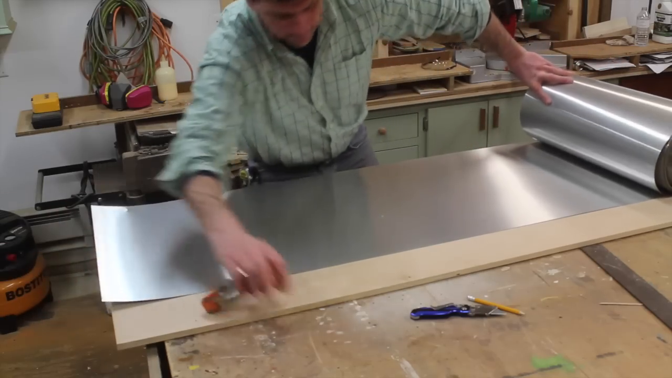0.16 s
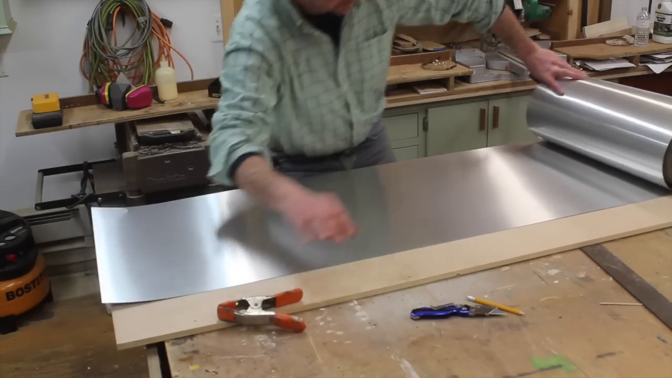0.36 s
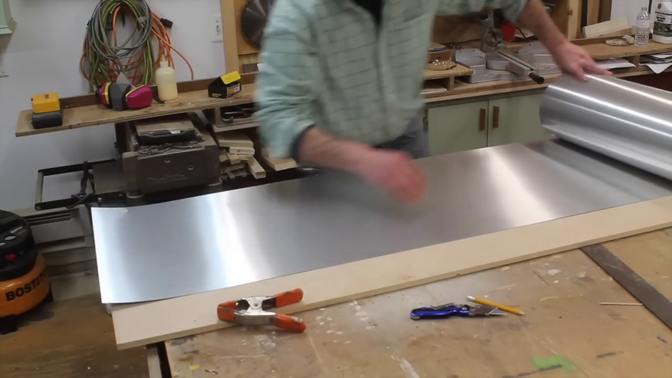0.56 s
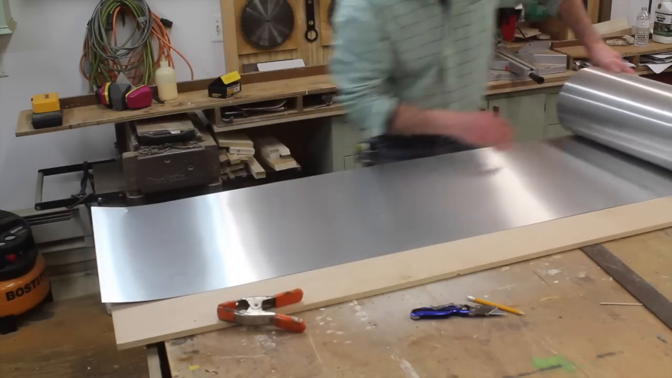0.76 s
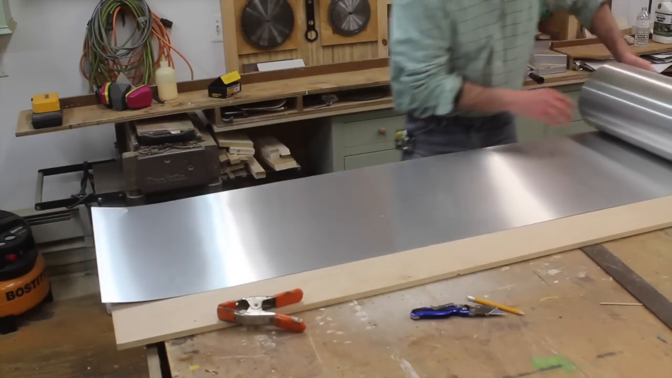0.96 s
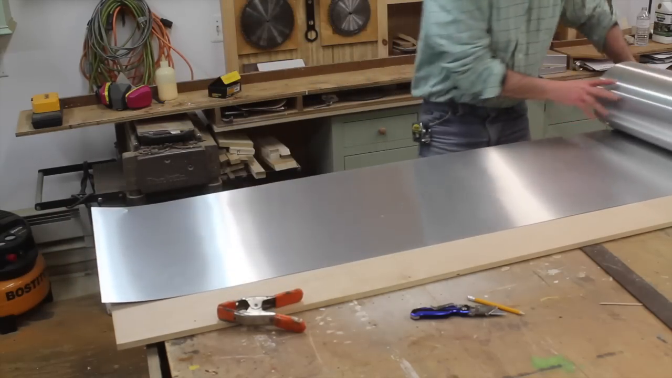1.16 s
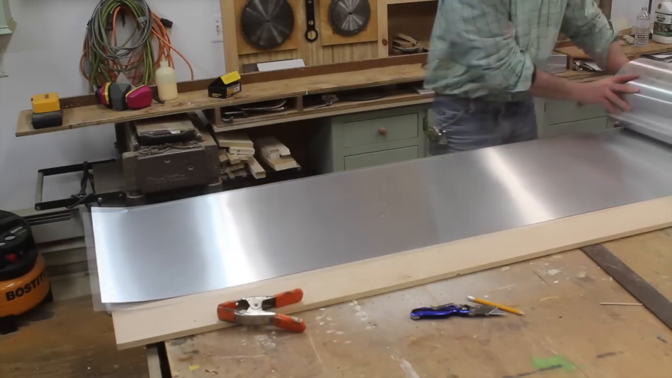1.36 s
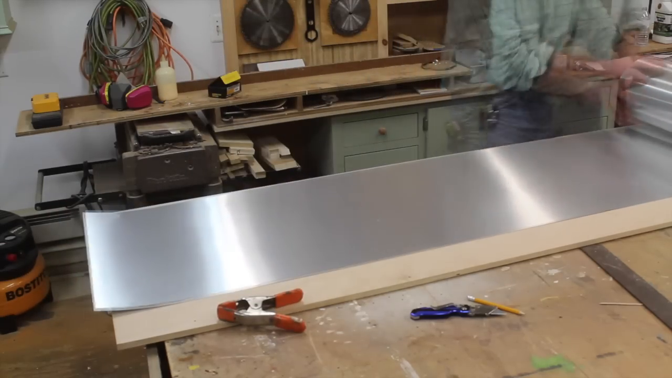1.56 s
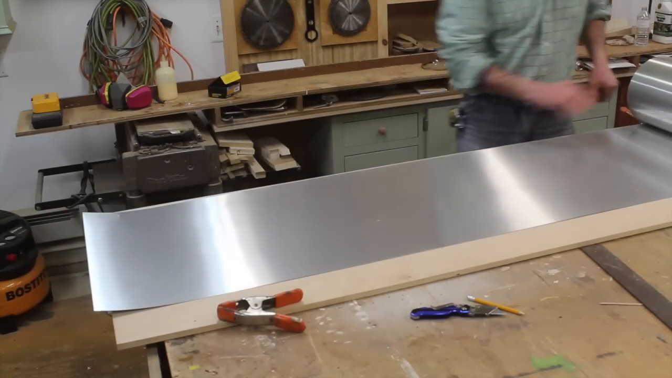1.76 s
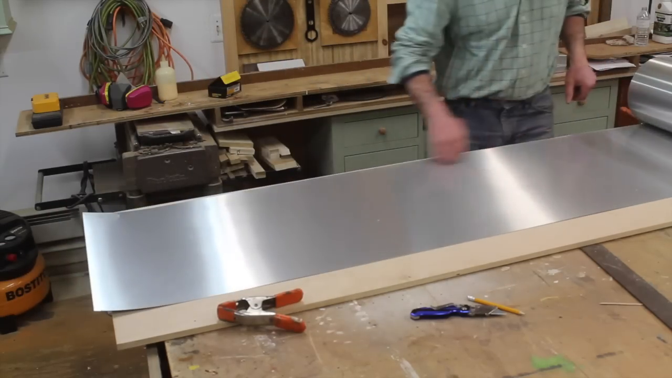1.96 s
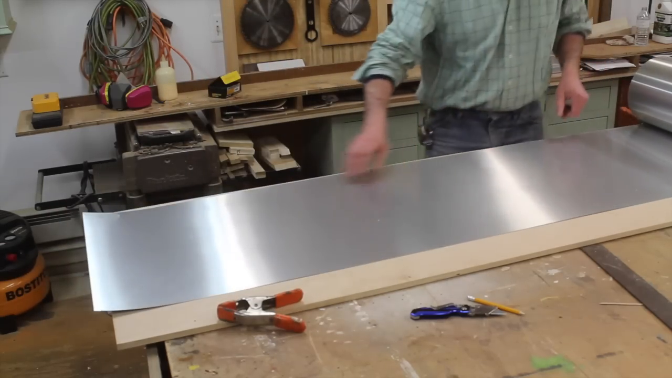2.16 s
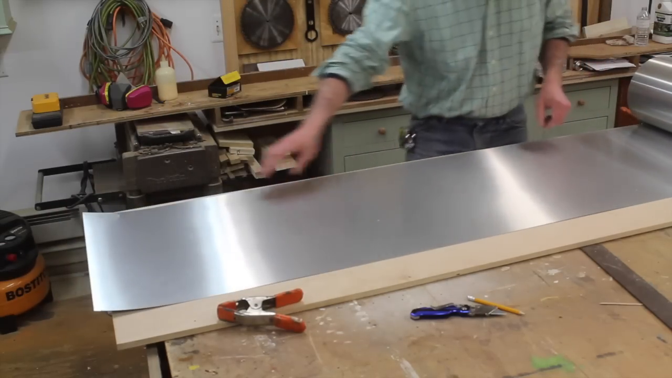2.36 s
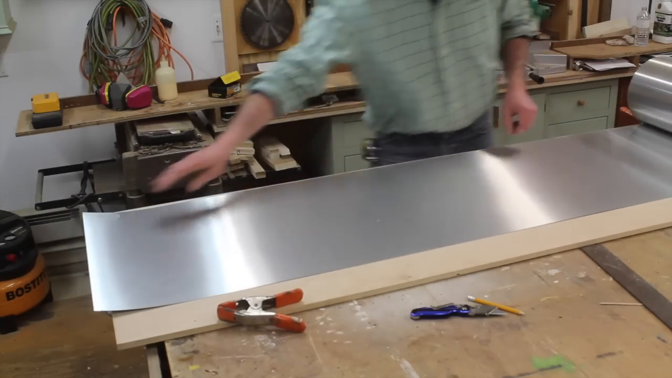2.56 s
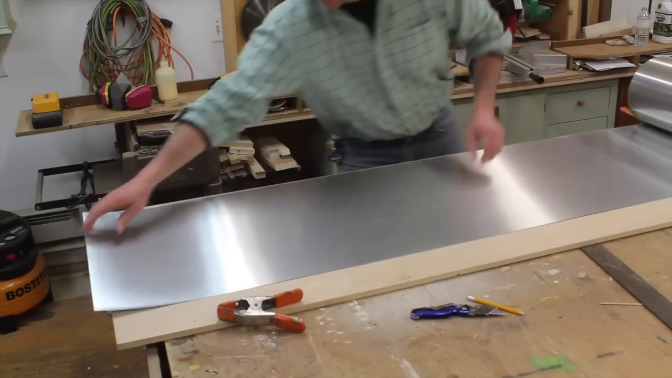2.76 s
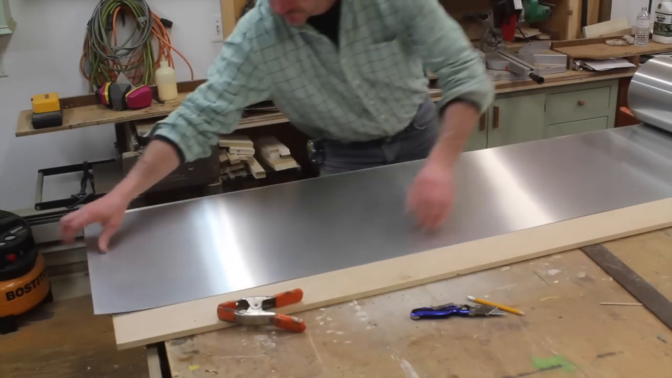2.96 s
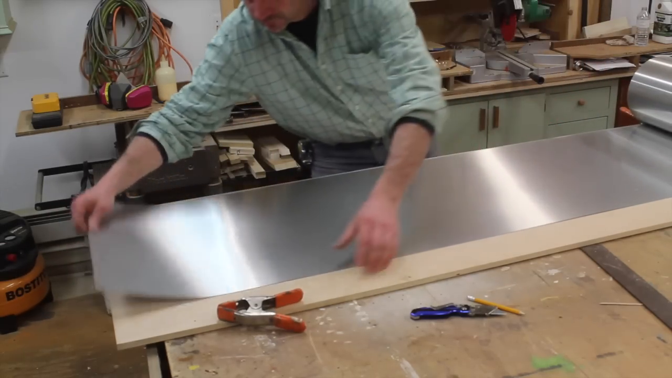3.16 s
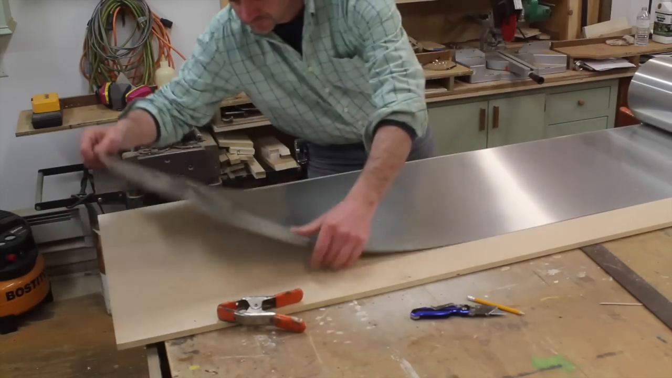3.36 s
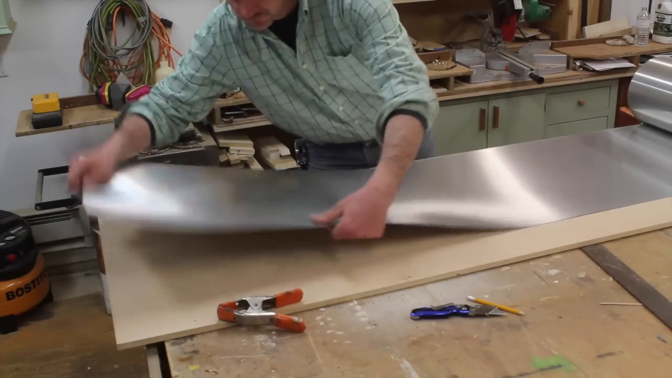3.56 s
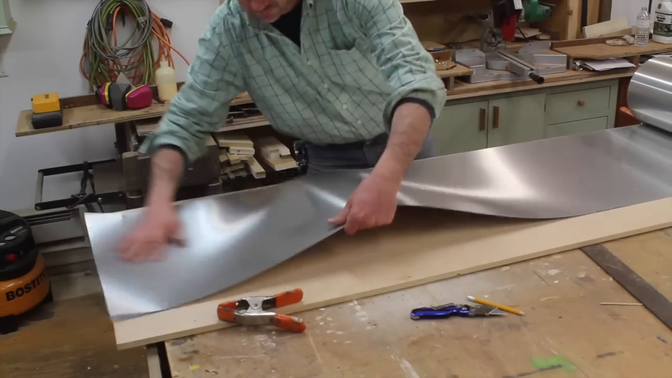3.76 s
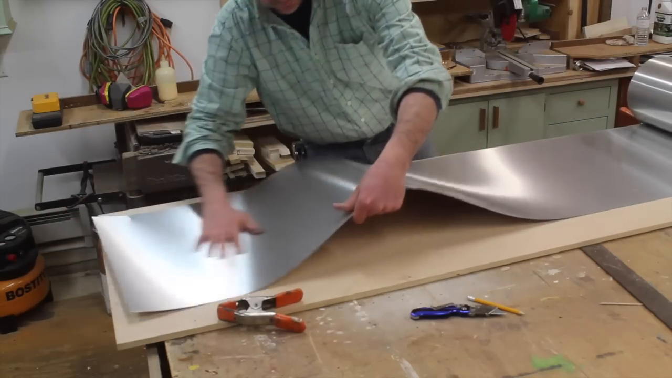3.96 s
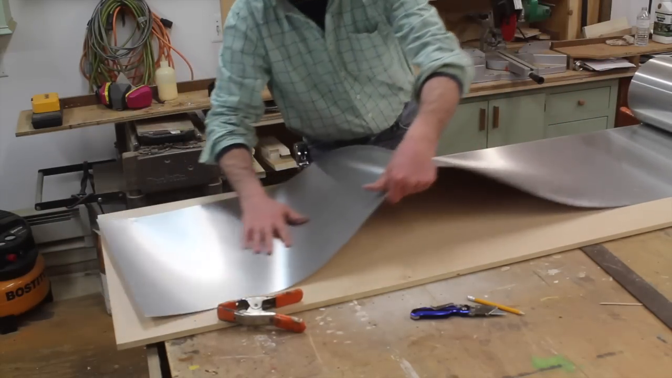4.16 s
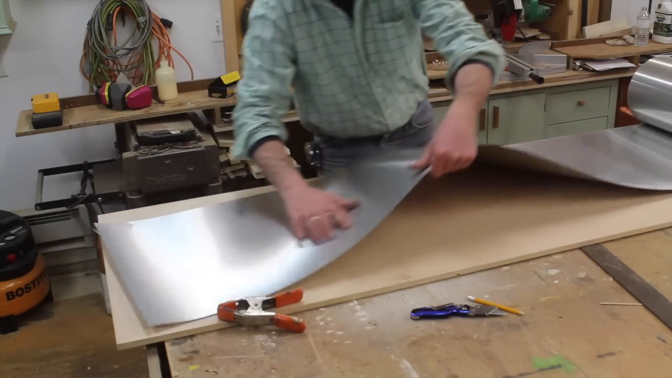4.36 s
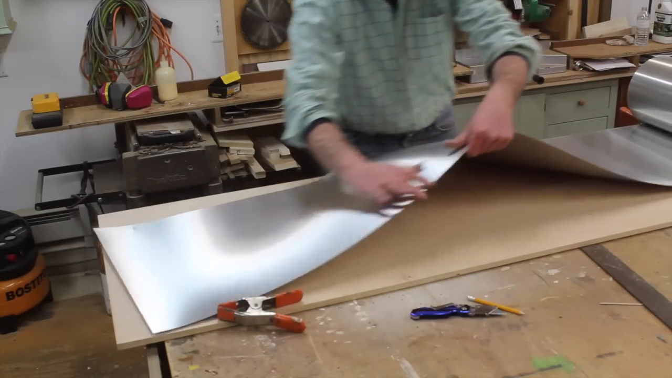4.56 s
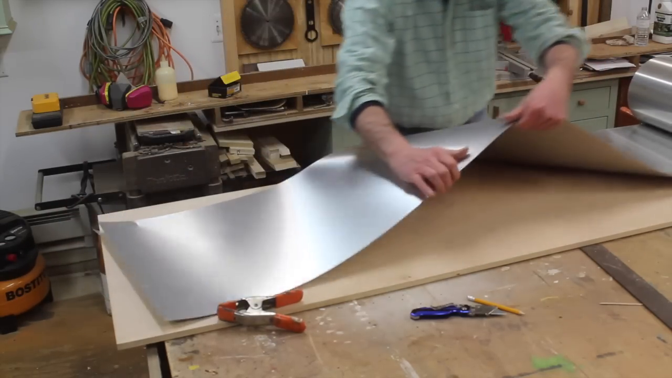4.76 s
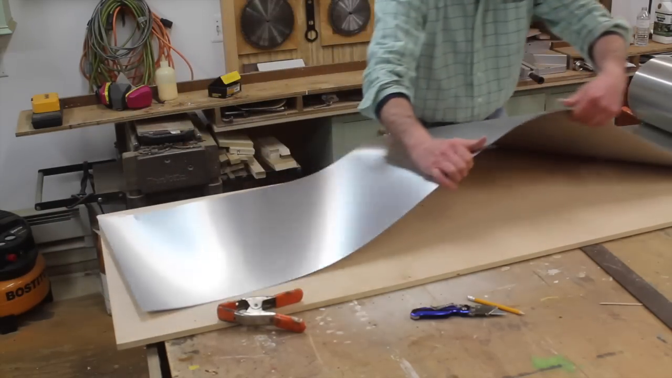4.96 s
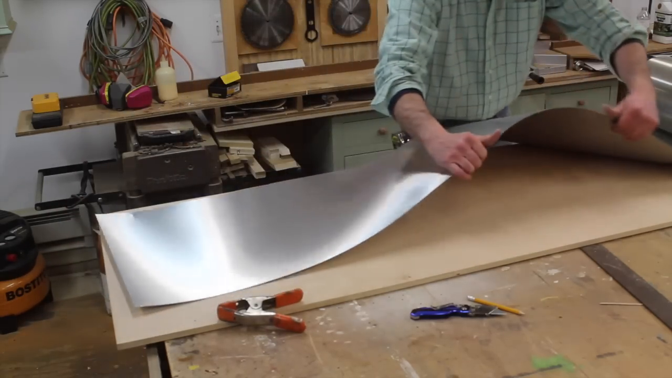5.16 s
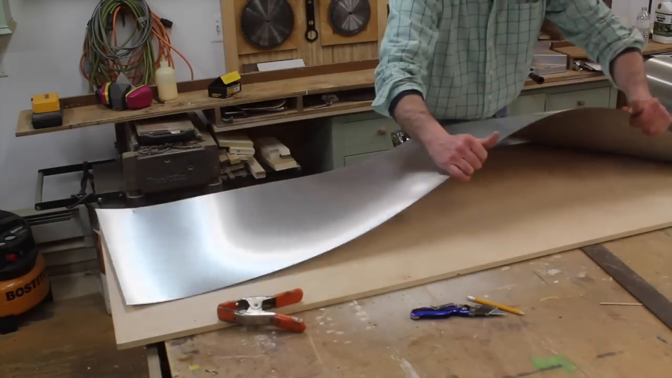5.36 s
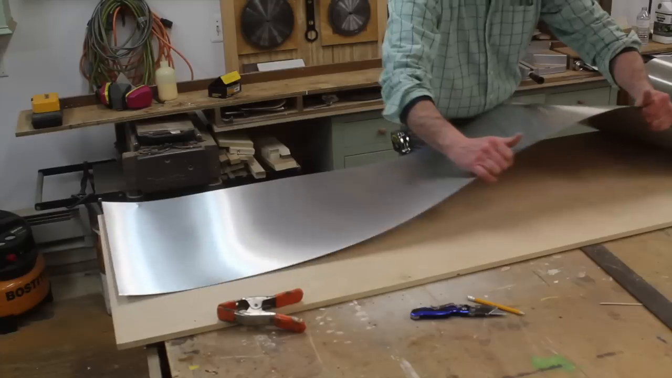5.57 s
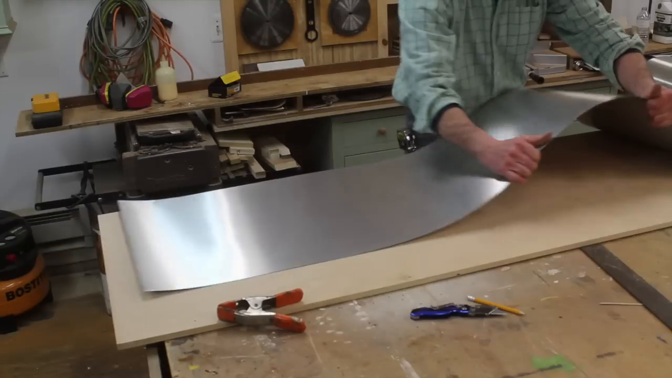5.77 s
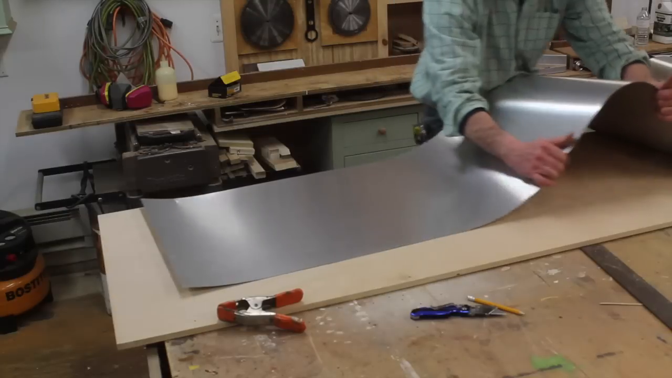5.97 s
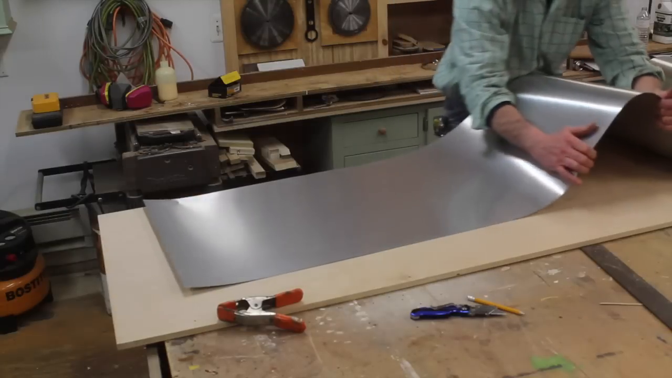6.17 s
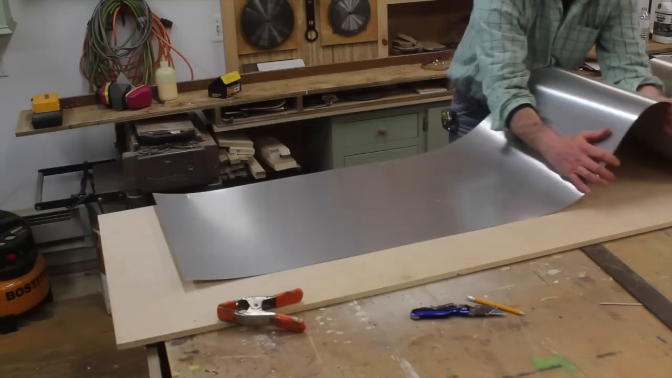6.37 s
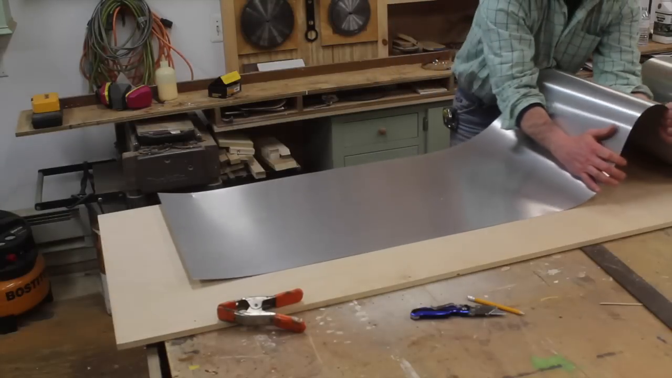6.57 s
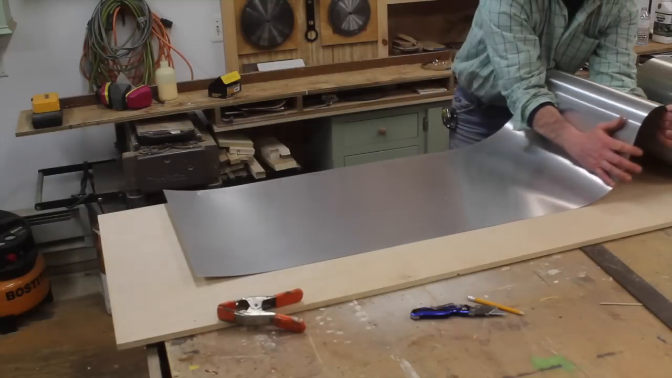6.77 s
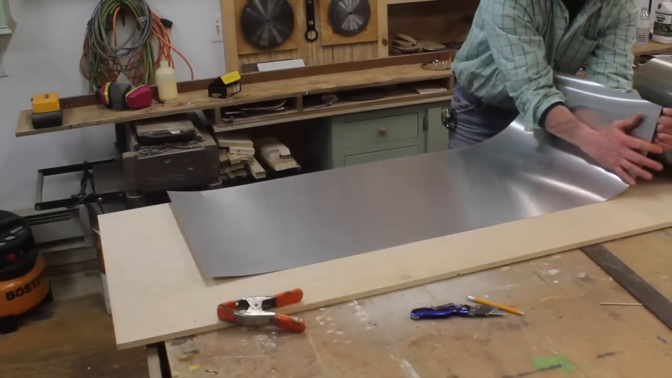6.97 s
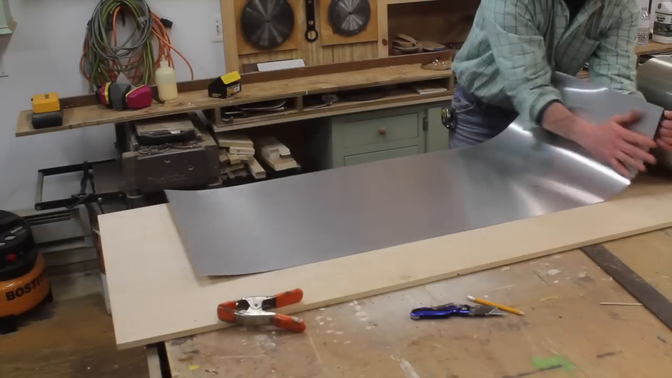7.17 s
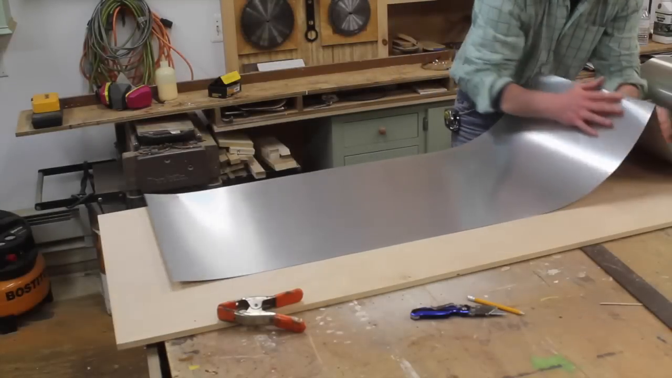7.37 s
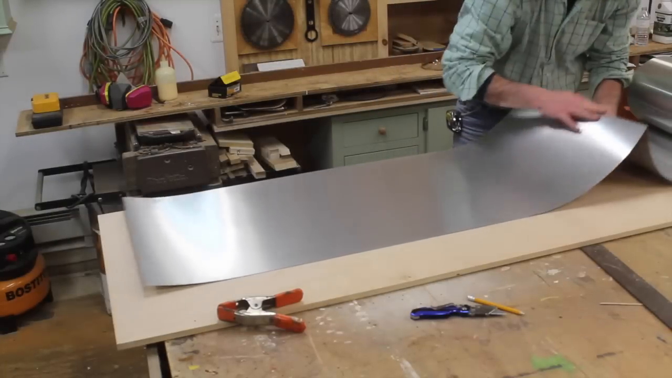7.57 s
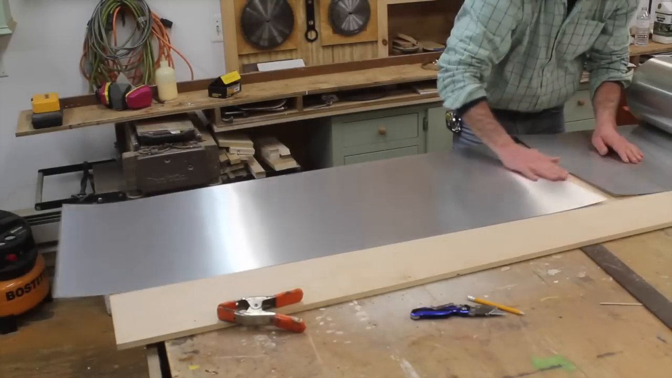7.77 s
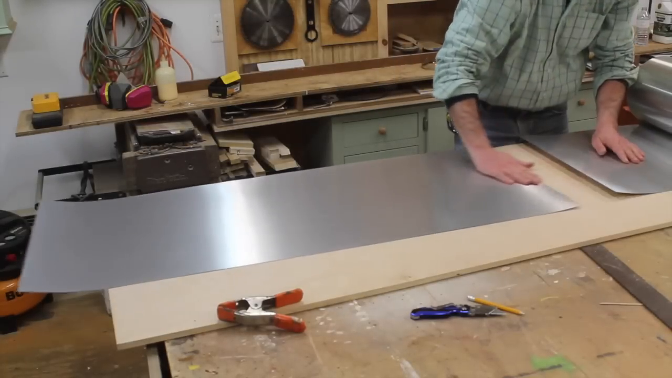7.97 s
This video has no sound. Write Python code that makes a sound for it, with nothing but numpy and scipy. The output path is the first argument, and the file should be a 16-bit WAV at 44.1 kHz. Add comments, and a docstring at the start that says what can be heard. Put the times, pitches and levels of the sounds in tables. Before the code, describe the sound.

A faint metallic ring fades at the start. At about 0.3 seconds a spring clamp drops on a wooden bench, bouncing quickly with a rattling spring and ringing jaws. A thin aluminium sheet pops once near 1 second. Quiet sliding, soft creases and dull thuds of feet and bench continue until about 3 seconds. At 3.4 the sheet buckles loudly, wobbles, and slaps down at 3.8 with a brief ring. From 4 to 7.7 seconds hands and the sheet's edge rub over metal and wood, with softer flexing pops, strongest between 5.5 and 6 seconds. At 7.8 the sheet snaps with a sharp crack, the loudest sound, and the freed piece rings over a thud and a short scrape. One camera microphone hears the workshop with faint steady hiss; the loudest hits sound squashed and briefly push the volume down.

```python
"""In a workshop, a faint ring dies away and a spring clamp drops on a wooden bench, bouncing and rattling.
From about 1 s a thin aluminium sheet is lifted and flexed: it buckles, pops and rings, while its edge
and the hands slide over wood and metal, and bench and floor thud. Near 3.8 s the sheet slaps down.
At 7.8 s it snaps along a scored line and the freed piece rings on. A camera's one microphone hears
it all; its amplifiers hiss, and loud sounds turn its volume down and have their peaks flattened."""
import sys
import numpy as np
from scipy import signal
from scipy.fft import rfft, irfft, next_fast_len
from scipy.io import wavfile
from scipy.ndimage import map_coordinates

SR = 44100
rng = np.random.default_rng(int(sys.argv[2]) if len(sys.argv) > 2 else 0)


def wav_record(signal):
    """Record a signal, one row per channel, as 16-bit PCM in the file named by sys.argv[1]."""
    frames = np.transpose(np.atleast_2d(signal))
    bounded = np.clip(frames, -1, 1)
    # unit amplitude maps onto the largest positive 16-bit level
    quanta = np.round(bounded * 32767).astype(np.int16)
    wavfile.write(sys.argv[1], SR, quanta)


N = 352932

# A mode is a pitch an object likes to ring at. Decay (t60) is the time to fade by 60 dB.
# Levels are relative. Sharp buckles and slaps of the sheet: (time [s], level [dB],
# lows over mids [dB], highs over mids [dB], ring over burst [dB], pitch the hit favours [Hz])
SHEET_POPS = [(1.026, -43, -0.5, -0.5, -1, 1370), (1.059, -14, -5.5, -5.5, -18, 920),
              (1.228, -33.5, -6, 1, -16, 1500), (1.81, -35, 4.5, -1, -12, 483),
              (3.4, 10, -22.5, -11.5, -14.5, 875), (3.772, 9, -23, -17.5, -7.5, 1350),
              (3.792, -1.5, -34, -6, -16, 1210), (4.097, -28, -34, -11, -16, 1300),
              (5.52, -18, -8, -13, -11, 2040), (6.037, -25.5, -0.5, -13, -6, 655),
              (6.365, -25.5, -25, 1, -11.5, 1810), (7.001, -35, 3.5, -5, -14, 596),
              (7.052, -19.5, -23, -1.5, -15.5, 1640), (7.523, -37, 5, -1.5, -13, 762),
              (7.79, 27, -8, -1, -24.5, 1080)]
# Creases rolling through the sheet: (the six columns of SHEET_POPS, rise time [ms])
SHEET_CREASES = [(1.148, -42.5, 11.5, 7.5, -18.5, 278, 6.3), (1.395, -43.5, 8.5, 0, -13, 277, 22),
                 (2.104, -30.5, 4, -6, -14, 254, 11.4), (2.467, -41.5, 9, -23, -4.5, 336, 7),
                 (2.634, -54, 16.5, -18, -2.5, 299, 3.6), (3.195, -45.5, 2.5, 8, -13, 348, 8.8),
                 (3.655, -23.5, 6.5, -30, -9.5, 390, 12), (3.672, -14.5, -1, -41, -5, 653, 13),
                 (3.709, -5, -3, -52, -12.5, 415, 12), (3.722, -7, -19, -30, -7, 859, 3.4),
                 (3.741, -15.5, 0.5, -48, 7, 677, 6), (3.757, -5.5, -2, -11, -7, 900, 22),
                 (4.284, -39.5, -9, -5, -9, 707, 8.9), (4.39, -35, -24, -6, -8, 667, 31),
                 (4.584, -29.5, -4, -18, -6.5, 595, 9.9), (4.68, -37, -3, 5, -16, 550, 12),
                 (5.134, -38, -0.5, -7, 0.5, 563, 5.4), (5.759, -28.5, -2, -39, -1, 698, 23),
                 (5.782, -31.5, -11, -38, -2.5, 800, 3), (5.826, -17, -5, -19, -0.5, 990, 9),
                 (5.961, -30, -15, -4, -7, 1360, 24), (6.788, -48, -0.5, 7.5, -8.5, 1466, 8),
                 (7.171, -51.5, 22, -14, -13.5, 285, 5), (7.264, -43.5, 7.5, 2, -23, 335, 23),
                 (7.385, -35.5, -26, 3, -9, 1180, 4.8), (7.56, -34, -4, 4.5, -15, 1090, 16),
                 (7.71, -38, -28, 9.5, -7, 1308, 10)]
# The clamp's bounces: (the six columns of SHEET_POPS)
CLAMP_BOUNCES = [(0.2635, -13, 10.5, 0.5, -19.5, 493), (0.274, -19.5, 17, 1.5, -13, 287),
                 (0.328, -6.5, 9.2, -0.5, -21, 1220), (0.337, -1, 11.8, 0, -17.5, 292),
                 (0.349, -42, 3, 9.5, -5, 312), (0.378, -18.5, 11, -6.5, -1.5, 293),
                 (0.41, -11, 1.4, -6, -4.5, 733), (0.419, -13, 14, -1.5, -18.5, 370),
                 (0.438, -29, 10, 3, 0, 473), (0.497, -27, 11.7, -24, -14, 288)]
# Rattles of the clamp's spring: (time [s], level [dB])
SPRING_TICKS = [(0.2633, -19.5), (0.276, -31), (0.3287, -23), (0.3372, -28.5), (0.351, -33), (0.3615, -29),
                (0.3768, -23), (0.4102, -18.5), (0.421, -29.5), (0.4374, -30), (0.4519, -29), (0.4709, -29),
                (0.485, -28)]
# Dull knocks of feet and bench: (time [s], level [dB], pitch [Hz], decay [s])
THUDS = [(0.273, -23.5, 110, 0.64), (0.49, -34, 52.6, 0.6), (0.665, -39, 153, 0.17),
         (1.058, -25.5, 160, 0.088), (1.284, -53, 162, 0.088), (1.465, -36.5, 154, 0.14),
         (1.811, -43.5, 110, 0.18), (2.034, -39.5, 127.5, 0.18), (2.117, -30.5, 133, .2),
         (2.638, -30.5, 160, 0.09), (2.916, -33, 65, 0.23), (2.931, -32, 151.6, 0.31),
         (3.072, -48.5, 65, 0.15), (3.198, -46.5, 65, 0.22), (3.851, -33, 62, 0.24),
         (4.469, -50.5, 131, 0.16), (4.707, -40, 88, 0.027), (6.062, -42, 144, 0.13),
         (6.41, -40, 171, 0.07), (6.477, -36.5, 154, 0.29), (7.003, -47.5, 81.5, 0.13),
         (7.168, -37.5, 134, 0.093), (7.8, -24, 164.5, 0.26), (7.831, -23, 69.4, 0.3)]
# Slides of sheet and hands: (time at full strength [s], swell [dB/s], hold [s], rubbing level [dB],
# wobble over rubbing [dB], rumble over rubbing [dB], grit over rubbing [dB])
STROKES = [(0.0, 200, 0.01, -51.5, -12, -16, -19.5), (0.46, 158, 0.058, -41.5, 11, 16.5, -13),
           (0.729, 394, 0.15, -58.5, 5.5, 5, -7), (1.01, 90, 0.21, -49.5, -2.5, -5.5, -14),
           (1.449, 59.5, 0.0067, -47, -1.5, 3, -11.5), (1.78, 277, 0.081, -52, -7, -1, -40),
           (2.04, 700, 0.048, -56, 2.5, 11, -12), (2.118, 300, 0.059, -37, -5.5, -4, -20.5),
           (2.55, 150, 0.03, -53.5, -0.5, -5, -13.5), (2.79, 596, 0.074, -59, -18, -19, -20),
           (2.95, 73, 0.045, -41.5, -3.5, -1.5, -17), (3.205, 700, 0.03, -52.5, -0.5, 0.5, -23),
           (3.47, 400, 0.1, -43, 14.5, -1, -19.5), (3.9, 40, 0.11, -46.5, 13, -4, -2),
           (4.06, 100, 0.13, -42.5, -6, -22, -13), (4.29, 100, 0.018, -46.5, -17, -16, -15),
           (4.44, 151, 0.14, -42, -2.5, -15, -13.5), (4.69, 100, 0.02, -43.5, 1, -3.5, -14),
           (4.99, 40, 0.11, -42.5, -1, -10.5, -11), (5.26, 40, 0.081, -43, -0.5, -11.5, -14),
           (5.58, 30, 0.12, -51.5, 4, -6, -9), (5.94, 129, 0.035, -43.5, 6.5, -4, -14),
           (6.12, 49.5, 0.12, -46.5, -0.5, -9, -10.5), (6.35, 40, 0.02, -47.5, -8, -12, -8.5),
           (6.42, 71.8, 0.088, -40, -3, -8.5, -13.5), (6.66, 100, 0.14, -54, 0.5, -10, -18),
           (7.108, 124, 0.0067, -44, -23, -9, -12.5), (7.29, 141, 0.1, -45.5, -0.5, -12, -10),
           (7.53, 60, 0.12, -51.5, 3, -5, -14.5), (7.75, 207, 0.044, -37.5, -2, -17, -2.5),
           (7.86, 296, 0.026, -26, -5, -20, -6.5)]

# Modes that stand out of a dense ring: (pitch [Hz], width [Hz], boost [dB])
SHEET_MODES = [(310, 17, 9.6), (432, 69, 2.1), (663, 5.9, 11), (752, 9, 6.8), (806, 36, 1.5),
               (1010, 43, 1.6), (1130, 35, 1.3), (1236, 33, 3.5), (1510, 15, 0.78), (2100, 16, 4.4),
               (2614, 38, 3.6), (2868, 12, 10.7), (3143, 150, 4.6), (3475, 8.7, 12), (4570, 37, 6),
               (6200, 280, 3.6), (7000, 360, 1.7)]
BENCH_AND_CLAMP_MODES = [(103, 8.6, 3), (177, 9.5, -8), (282, 20, 0), (277, 12, 10), (420, 17.8, -19),
                         (498, 28, 3.5), (565, 27, 9), (926, 150, 12), (1192, 83, 12.5), (2470, 100, 3.5),
                         (3160, 610, 3.5), (4880, 940, 8)]
# Modes heard as separate tones: (pitch [Hz], level [dB], decay [s])
SLAP_TONES = [(4580, -34.5, 0.22)]  # the sheet after it slaps down
OFFCUT_TONES = [(1170, -24.5, 0.59), (1620, -9, .5), (3130, -34.5, 0.46), (3420, -20, 1),
                (4320, -29.5, 0.24), (4590, -6, 0.36)]  # the freed piece
JAW_TONES = [(3080, -17.5, 0.49), (3300, -24.5, 0.21), (4380, -26.5, .5)]  # the clamp's steel jaws
SPRING_TONES = [(10800, 3.5, 0.007), (12400, -3, .004), (13300, 1, .004), (14200, 4, .004),
                (15100, 3, 0.0043), (8700, -3, 0.0051)]  # the clamp's spring
# How long object and room ring: (frequency [Hz], decay [s])
RING_DECAY = [(60, 0.6), (260, 0.38), (700, 0.45), (1840, 0.34), (3300, 0.5), (4850, 0.4), (8000, 0.33),
              (12800, 0.13)]
# Where the bands of a hit lie: (boom [Hz], lows [Hz], start of mids [Hz], end of mids [Hz], highs [Hz])
BAND_HZ = [130, 450, 900, 1650, 3000]
# How wide the bands are: (boom [Hz], lows [Hz], mids [Hz], highs [Hz], crack [Hz])
BAND_WIDTH_HZ = [220, 500, 1200, 2500, 10000]

# Tone colours of the noises: (frequency [Hz], level [dB])
BENCH_RUMBLE = [(18, -57.5), (30, -88.5), (59, -2.5), (97, -10), (140, 0.5), (197, -5), (259, 0.5),
                (405, -5.5), (450, -21), (500, -7.5), (650, -44.5), (1100, -120)]
SHEET_WOBBLE = [(120, -28), (200, -34.5), (354, 0), (401, -0.5), (510, 0), (1180, 1.5), (2400, -6),
                (3120, -55), (5280, -120)]
RUBBING = [(710, -40), (1200, -7), (1760, -2), (2280, -1.5), (3160, 0), (3980, -5.5), (6000, -18.5),
           (7800, -19), (13200, -120)]
FINE_GRIT = [(3000, -89), (4500, -1.5), (7000, -11), (9000, -9), (16000, -19)]
OPENING_RING = [(900, -31), (1400, 8), (1540, 8.5), (1750, -20.5), (2600, -26.5), (3200, -4.5), (4000, -54)]
ROOM_HISS = [(30, -5), (100, -0.5), (220, -21), (330, -29), (1000, -9.5), (2000, -19), (3250, -10),
             (3700, -15), (8000, -20.5), (13000, -19.5), (16000, -20.5)]  # room and microphone
AMPLIFIER_HISS = [(30, -6), (124, 2), (600, 0), (16000, -5)]

SLAP_ROW = 5  # the pop where the sheet slaps down
CRACK_DB, CRACK_SLOPE = -10.5, 3.28  # the crack gains 3.28 dB for each dB of highs
THUD_RISE = 0.04  # swell time as a share of the decay
STROKE_FADE_DB_PER_S = 118  # a slide dies away with the room
TREBLE_LIMIT_HZ = 15900


def sheet_buckles():
    """The flexed sheet gives way in sharp pops and in softer creases that swell in."""
    pops = hits(SHEET_POPS, SHEET_MODES, burst_t60=0.016, boom_db=-9.5, favoured_db=7,
                min_rise_ms=2.1, crack_db=5)
    creases = hits(SHEET_CREASES, SHEET_MODES, burst_t60=0.042, boom_db=-9.5, favoured_db=14.5,
                   min_rise_ms=1.1, crack_db=-17.5, boom_cut=0.9)
    return pops + creases


def slap_ring():
    """One mode rings on after the sheet slaps down."""
    return chime([SHEET_POPS[SLAP_ROW]], SLAP_TONES)


def offcut_ring():
    """The piece that breaks free at the last snap rings on."""
    snap_time = SHEET_POPS[-1][0]
    return chime([(snap_time, 0)], OFFCUT_TONES)


def clamp_drop():
    """The bouncing clamp knocks the bench; its spring rattles and its steel jaws ring."""
    knocks = hits(CLAMP_BOUNCES, BENCH_AND_CLAMP_MODES, burst_t60=0.032, boom_db=-14, favoured_db=14,
                  min_rise_ms=0.9, crack_db=-5)
    return knocks + spring_rattle() + chime(CLAMP_BOUNCES, JAW_TONES)


def spring_rattle():
    """Each tick rings the spring's short steel modes at new random strengths."""
    out, t = np.zeros(N), np.arange(SR // 40) / SR
    for start, db in SPRING_TICKS:
        ring = sum(amp(level + rng.normal(0, 2.3) - 60 * t / t60) * np.sin(2 * np.pi * hz * t)
                   for hz, level, t60 in SPRING_TONES)
        add(out, start, amp(db - 8) * ring * (1 - np.exp(-t / 0.00037)))
    return out


def hits(events, modes, burst_t60, boom_db, favoured_db, min_rise_ms, crack_db, boom_cut=0):
    """A hit is a short burst, then a dense ring. Its place, or the sheet's curve, favours one pitch."""
    out, ring_size, burst_size = np.zeros(N), SR // 2, SR // 8
    t = np.arange(ring_size) / SR
    spread = 1 - np.exp(-t / 0.0039)  # the waves need time to spread
    for start, db, low_db, high_db, ring_db, favoured_hz, *swell_ms in events:
        boom = low_db + boom_db - boom_cut * max(db + 31.5, 0)  # the cut grows in strong hits
        crack = max(CRACK_DB + CRACK_SLOPE * high_db + crack_db, -45)
        bands = np.array([boom, low_db, 0, high_db, crack])
        colour = hit_colour(bands)
        total_db = db + 10 * np.log10(np.sum(amp(2 * bands)))
        rise_ms = max([min_rise_ms, *swell_ms])
        onset = 1 - np.exp(-(t * 1000 / rise_ms) ** 2)

        ring_modes = [*modes, (favoured_hz, 0.2 * favoured_hz, favoured_db - 5)]
        ring = ring_down(noise(colour, ring_modes, ring_size))
        add(out, start, amp(total_db + ring_db) * ring * spread * onset)

        burst_modes = [*modes, (favoured_hz, 0.088 * favoured_hz, favoured_db)]
        brighter = [(hz, level + 1 if hz > 4500 else level) for hz, level in colour]
        shape = onset * amp(-60 * t / (burst_t60 + 0.0017 * rise_ms))
        burst = noise(brighter, burst_modes, burst_size) * shape[:burst_size]
        add(out, start, amp(total_db - 1.5) * burst / np.max(np.abs(burst)))
    return out


def hit_colour(bands_db):
    """Spreads each band's energy over its width, giving (frequency [Hz], level [dB]) points."""
    boom, low, mid, high, crack = bands_db - 10 * np.log10(BAND_WIDTH_HZ)
    return [(30, -120), (60, boom - 30), *zip(BAND_HZ, [boom, low, mid, mid, high]), (4100, high - 5),
            (5000, crack + 4), (8000, crack + 3), (10000, crack - 4), (16000, crack - 6)]


def ring_down(sound):
    """Object and room let each frequency die away at its own speed."""
    hz, times, spectrum = signal.stft(sound, SR, nperseg=256)
    fade = amp(-60 * times / value_at(RING_DECAY, hz)[:, None])
    return signal.istft(spectrum * fade, SR, nperseg=256)[1][:len(sound)]


def chime(events, tones):
    """Each hit starts long tones; the shaking of the piece blurs their pitch."""
    out, t = np.zeros(N), np.arange(SR // 2) / SR
    for start, hit_db, *_ in events:
        for hz, db, t60 in tones:
            drift = np.cumsum(rng.normal(0, 0.064, len(t)))
            shape = amp(hit_db + db - 60 * t / t60) * (1 - np.exp(-t / 0.0033))
            add(out, start, shape * np.sin(2 * np.pi * hz * t + drift))
    return out


def sliding():
    """Sliding surfaces catch unevenly, so each layer of noise throbs at its own speed."""
    rub_gain, wobble_gain, rumble_gain, grit_gain = stroke_gains()
    catch = wander(25)
    rumble = rumble_gain * normalise(amp(2.5 * wander(14)) * noise(BENCH_RUMBLE))
    wobble = wobble_gain * normalise(amp(0.5 * catch + 1.2 * wander(40)) * noise(SHEET_WOBBLE, SHEET_MODES))
    rub = rub_gain * normalise(amp(catch + 0.37 * wander(66)) * noise(RUBBING, SHEET_MODES))
    grit = grit_gain * normalise(amp(0.73 * catch + 0.89 * wander(140)) * noise(FINE_GRIT))
    return rumble + wobble + rub + grit


def stroke_gains():
    """Each slide swells, holds and fades; where slides overlap, their powers add."""
    t = np.arange(0, N / SR + 0.01, 0.002)
    full_at, swell, hold, rub_db, *layers_db = np.transpose(STROKES)[:, :, None]
    swell_db = swell * np.minimum(t - full_at, 0)
    fade_db = STROKE_FADE_DB_PER_S * np.maximum(t - full_at - hold, 0)
    shape_db = rub_db + swell_db - fade_db
    powers = [np.sum(amp(2 * (shape_db + db)), axis=0) for db in (0, *layers_db)]
    return [np.interp(np.arange(N) / SR, t, np.sqrt(power)) for power in powers]


def thuds():
    """Each knock of feet or bench is one fading low tone with a soft start, blurred by noise."""
    out, t = np.zeros(N), np.arange(SR * 3 // 4) / SR
    for start, db, hz, t60 in THUDS:
        shape = amp(-60 * t / t60) * (1 - np.exp(-(t / (THUD_RISE * t60)) ** 2))
        blur = noise([(hz / 2, -30), (hz, 0), (2 * hz, -6), (4 * hz, -18), (8 * hz, -50)], size=len(t))
        tone = np.sin(2 * np.pi * hz * t) + 0.48 * blur
        add(out, start, amp(db) * shape / shape.max() * tone)
    return out


def room():
    """Room and microphone hiss steadily; at the start a faint ring dies away."""
    t = np.arange(N) / SR
    return amp(-57.5) * noise(ROOM_HISS) + amp(-49 - 60 * t / 0.53) * noise(OPENING_RING)


def noise(colour, modes=(), size=N):
    """Noise of strength 1 with the given tone colour, boosted at each mode."""
    padded = next_fast_len(size)
    hz = np.fft.rfftfreq(padded, 1 / SR)
    peaks = 1 + sum((amp(db) - 1) / (1 + (2 * (hz - pitch) / width) ** 2) for pitch, width, db in modes)
    spectrum = rfft(rng.standard_normal(padded)) * amp(value_at(colour, hz)) * peaks
    return normalise(irfft(spectrum, padded)[:size])


def wander(rate):
    """A smooth curve through `rate` random points a second."""
    return map_coordinates(rng.standard_normal(int(N * rate / SR) + 4), [np.arange(N) * rate / SR])


def value_at(points, hz):
    """Reads between (frequency [Hz], value) points on a log frequency scale."""
    frequencies, values = np.transpose(points)
    return np.interp(np.log(hz + 1), np.log(frequencies + 1), values)


def amp(db):
    """Turns decibels into a multiplier."""
    return 10 ** (np.asarray(db) / 20)


def normalise(sound):
    """Scales a sound to an average strength (rms) of 1."""
    return sound / np.sqrt(np.mean(sound ** 2) + 1e-20)


def add(track, start, sound):
    """Mixes a sound in at a start time [s]."""
    part = track[round(start * SR):][:len(sound)]
    part += sound[:len(part)]


def scene():
    """One microphone feeds the same mix to both channels."""
    sound = clamp_drop() + sheet_buckles() + room() + slap_ring() + offcut_ring() + thuds() + sliding()
    return np.array([sound, sound])


def record(dry):
    """The camera cuts bass, adds hiss to each channel, turns loud sound down and cuts the top treble."""
    dry = signal.sosfilt(signal.butter(4, 42, "highpass", fs=SR, output="sos"), dry)
    wet = dry + amp(-54.5) * np.array([noise(AMPLIFIER_HISS), noise(AMPLIFIER_HISS)])
    memory = np.exp(-1 / (0.07 * SR))  # the gain control averages over about 70 ms
    power = signal.lfilter([1 - memory], [1, -memory], dry[0] ** 2)
    wet = wet / (1 + power / amp(-21.5) ** 2) ** 0.34
    wet = wet / (1 + np.abs(wet / 0.99) ** 20) ** (1 / 20)  # flattens the peaks
    padded = next_fast_len(N + 4096)
    passes = np.fft.rfftfreq(padded, 1 / SR) < TREBLE_LIMIT_HZ
    return irfft(rfft(wet, padded) * passes, padded)[:, :N]


dry = scene()
out = record(dry)
wav_record(out)
```